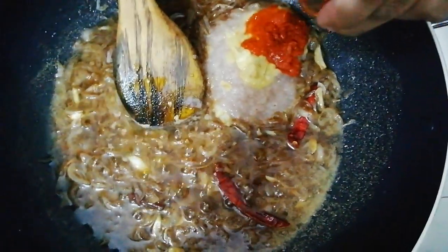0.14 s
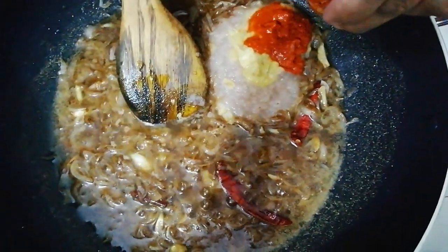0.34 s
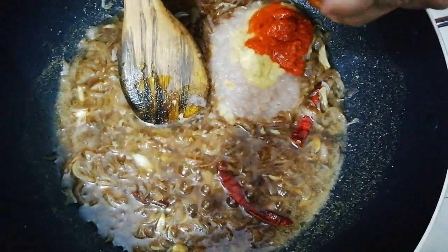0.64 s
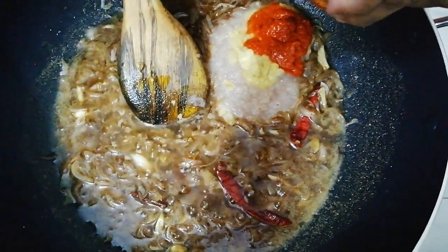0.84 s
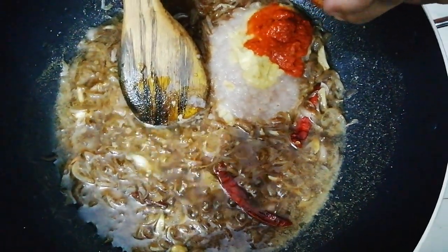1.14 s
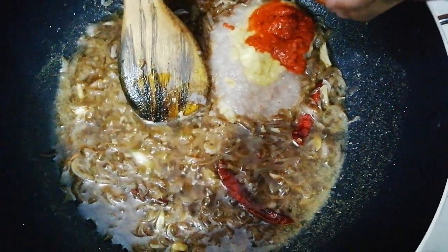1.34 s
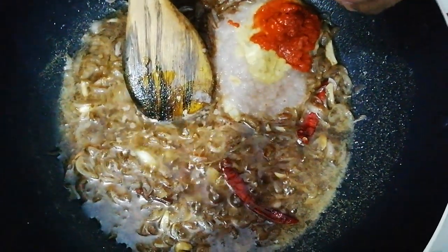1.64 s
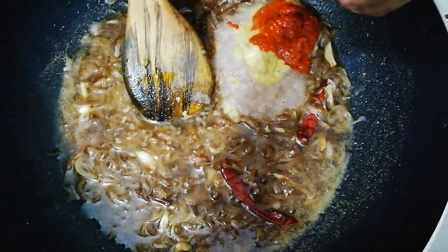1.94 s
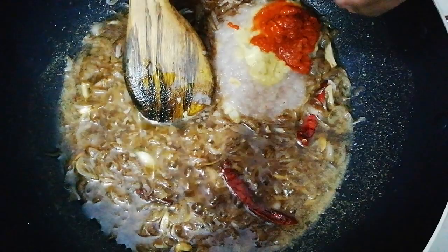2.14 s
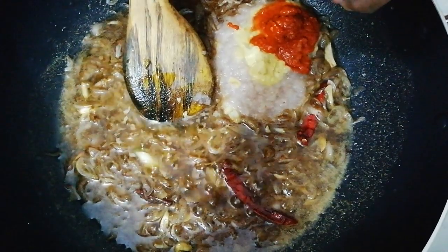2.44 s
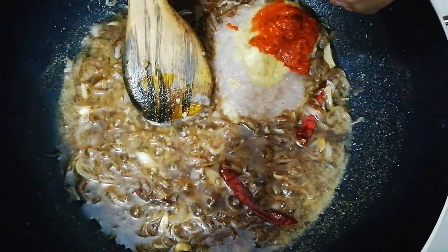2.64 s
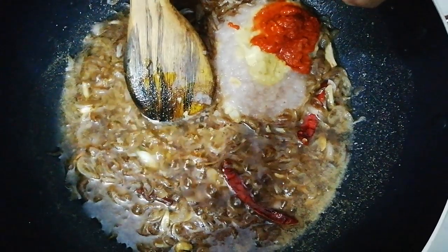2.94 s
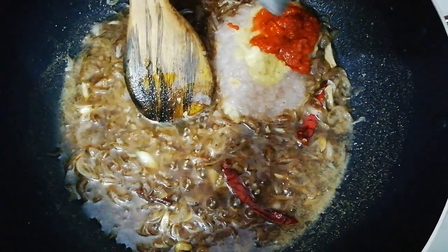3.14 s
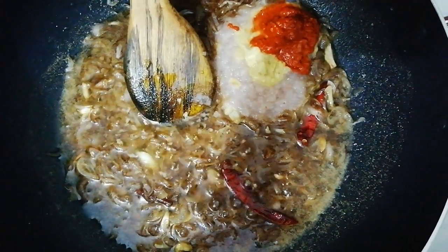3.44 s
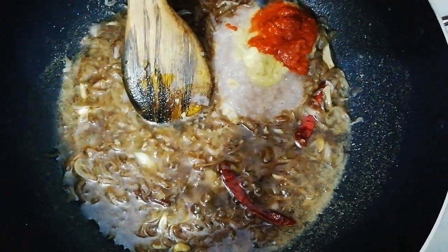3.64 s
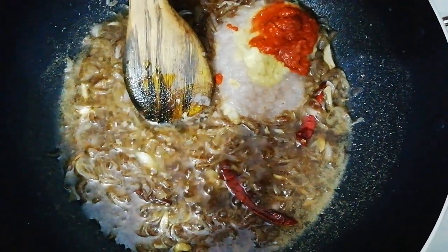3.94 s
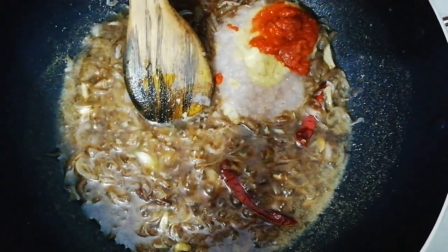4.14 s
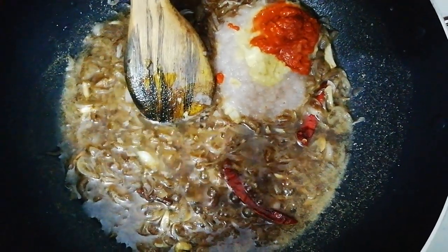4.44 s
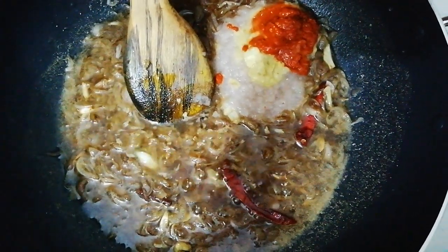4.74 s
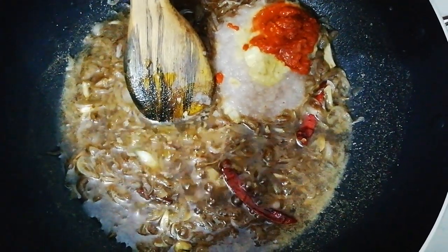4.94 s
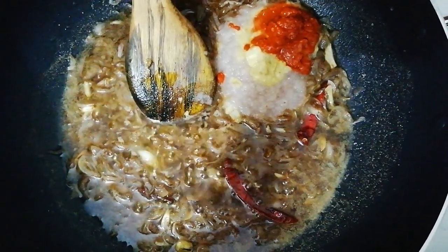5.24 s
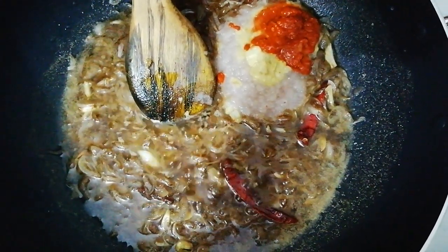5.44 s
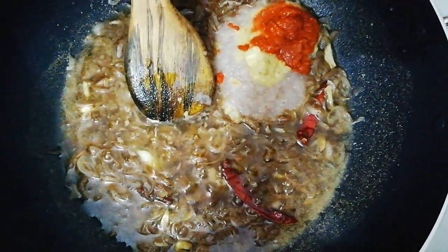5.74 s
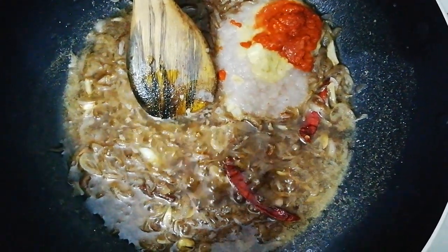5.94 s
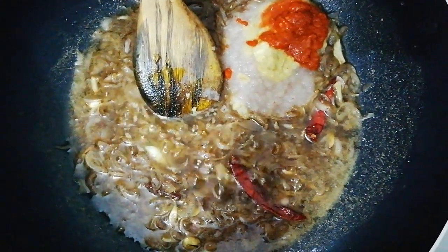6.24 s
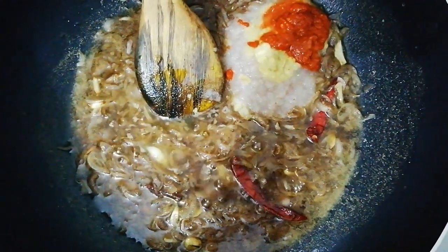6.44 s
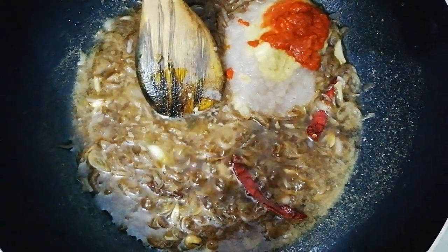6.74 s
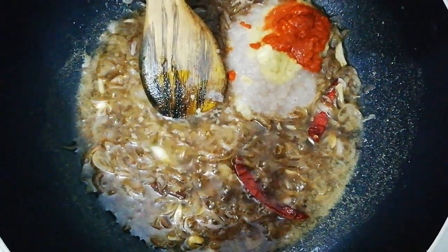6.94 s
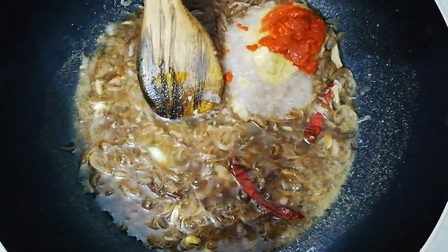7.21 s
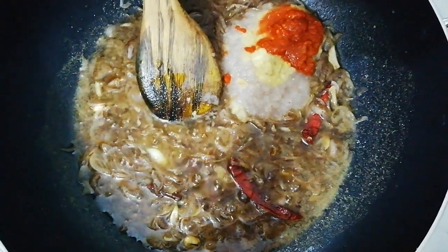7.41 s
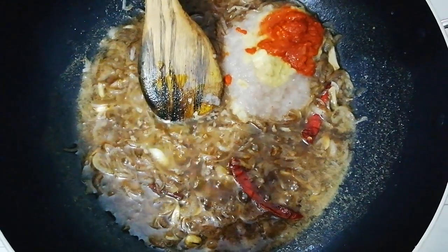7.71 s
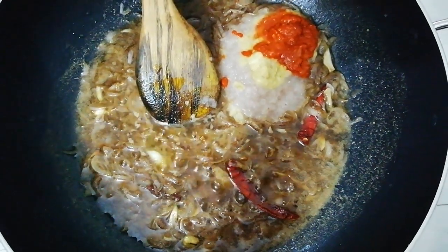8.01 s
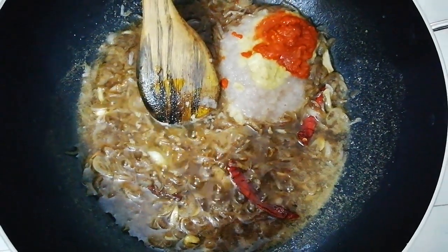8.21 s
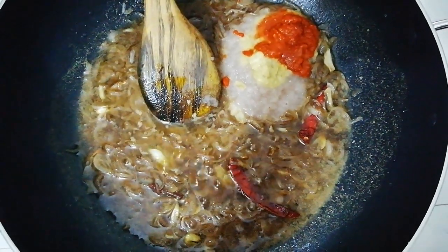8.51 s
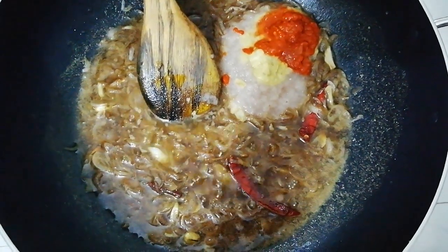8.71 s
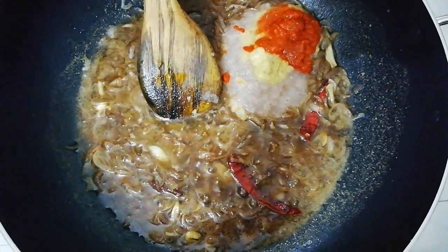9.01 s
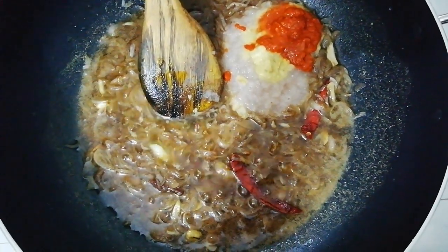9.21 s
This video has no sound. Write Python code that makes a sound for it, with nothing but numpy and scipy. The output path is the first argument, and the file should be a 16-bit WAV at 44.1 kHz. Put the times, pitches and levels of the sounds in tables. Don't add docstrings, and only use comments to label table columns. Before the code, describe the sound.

A close stereo pickup in a hard-walled home kitchen. Throughout, onions fry gently: a thin, high fizz of tiny steam bubbles with scattered crisp pops, leaning right, over a low fan hum with faint motor whines. From 0.1 to 3.3 seconds a steel spoon strikes a small hand-held steel bowl in irregular loud clinks, bright and very short, with lighter bounces, brief edge scrapes and a few soft dull knocks into paste; each leaves a short splashy room tail. After a pause, another cluster comes at 4.2 to 4.8, and a last weaker tap near 5.1. At about 6.1 a faint thin metal rattle sings as the bowl is lifted away. Sharper oil pops snap near 6.35. A dull soft thud comes from next door at 8.0, a stronger one at 8.3, and at 8.4 the bowl is set down further off, rocking quickly with a freer ring. Frying and fan continue to the end, with clear pops around 9.

```python
import sys
import numpy as np
from scipy import signal
from scipy.fft import irfft, next_fast_len
from scipy.io import wavfile

SR = 44100
rng = np.random.default_rng(int(sys.argv[2]) if len(sys.argv) > 2 else 0)


def dump(signal):
    limited = np.clip(np.atleast_2d(signal).T, -1, 1)
    pcm = np.round(limited * 32767).astype(np.int16)
    wavfile.write(sys.argv[1], SR, pcm)


def undo_db(level):
    steps = np.asarray(level, float) / 20
    return 10 ** steps


N = 413216
LEAD = SR // 4


def rms_one(x):
    return x / np.sqrt(np.mean(x ** 2) + 1e-20)


def at_hz(points, hz):
    points_hz, values = np.transpose(points)
    return np.interp(np.log(hz), np.log(points_hz), values)


def band(x, low_hz, high_hz):
    return signal.sosfilt(signal.butter(2, [low_hz, high_hz], "band", fs=SR, output="sos"), x)


# pitch_hz, likeness (0 to 1)
LIKENESS = [(30, .998), (60, 1), (125, 0.96), (250, 0.9), (400, 0.83), (600, 0.024), (2000, 0.028),
            (12000, 0.0084)]


def coloured_noise(spectrum):
    size = next_fast_len(N)
    hz = np.maximum(np.arange(size // 2 + 1) * SR / size, 1)
    mid, side = rng.standard_normal((2, len(hz), 2)) @ [1, 1j]
    alike = np.clip(at_hz(LIKENESS, hz), 0, 1)
    left_right = np.array([[1], [-1]])
    pair = np.sqrt(1 + alike) * mid + np.sqrt(1 - alike) * side * left_right
    return rms_one(irfft(pair * undo_db(at_hz(spectrum, hz)), size)[:, :N])


# pitch_hz, level_db (per Hz)
HUM = [(12, -49), (20, -10.5), (64, -1.5), (156, -13), (304, -8.5), (339, -11), (370, -10.5), (677, -13),
       (859, -10), (1680, -15.5), (1910, -15.5), (2480, -20), (3500, -51), (4550, -74), (7700, -120)]
HUM_DB = -47.5
# pitch_hz, width_hz, wavering_db, steady_db
WHINES = [(63.4, 13.9, -56, -71), (96.9, 13, -62, -67), (204.6, 12, -75, -88), (264, 10, -80, -78),
          (370.2, 4.3, -64, -60.5), (428, 14, -61, -76.5), (1079, 2.1, -76.5, -100), (1860, 11, -64.5, -75),
          (1880, 8.5, -65.5, -86)]


def fan():
    out = undo_db(HUM_DB - 2.0) * coloured_noise(HUM)
    t = np.arange(N) / SR
    for hz, width, wavering_db, steady_db in WHINES:
        peak = [(hz - 4 * width, -90), (hz - width / 2, -3), (hz, 0),
                (hz + width / 2, -3), (hz + 4 * width, -90)]
        out += undo_db(wavering_db) * coloured_noise(peak)
        turns = rng.random((2, 1)) * (1 - at_hz(LIKENESS, hz))
        out += undo_db(steady_db + 4.5) * np.sin(2 * np.pi * (hz * t + turns))
    return out


# start_s, level_db, boom_hz, rumble_s
THUDS = [
    (7.972, -47.5, 205, 0.13),
    (8.309, -43, 283, 0.17),
]


def thuds():
    out = np.zeros((2, N))
    t = np.arange(SR // 2) / SR
    for s, db, hz, length in THUDS:
        noise = rng.standard_normal((2, len(t))) * 0.92 + rng.standard_normal(len(t))
        boom = rms_one(band(noise, hz * 0.9, hz * 1.47))
        knock = rms_one(band(noise, hz * 1.02, hz * 2.74))
        shape = np.clip(t / 0.0024, 0, 1) * undo_db(-15 * t - 180 * np.maximum(t - length, 0))
        at = round(s * SR)
        out[:, at:at + len(t)] += undo_db(db) * (boom + undo_db(0.5) * knock) * shape
    return out


def ring(clicks, hz, t60):
    r, w = undo_db(-60 / (t60 * SR)), 2 * np.pi * hz / SR
    return signal.lfilter([0, np.sin(w)], [1, -2 * r * np.cos(w), r * r], clicks + 1e-18)


def burst(clicks, hz, cycles):
    t60 = cycles / hz
    return ring(ring(clicks, hz, t60), hz, t60)


# start_s, level_db (peak), left_minus_right_db
POPS = [(0.2977, -31, -1), (1.8205, -32, -2.0), (3.1486, -33, -13), (3.2102, -53.5, -9), (3.269, -40, -13),
        (3.6959, -34, -14), (3.9693, -34, -11), (4.0042, -28.5, -9), (4.6616, -33, -4), (4.9995, -45, -4.0),
        (5.4657, -34, -5), (5.5411, -31.5, -15), (5.6738, -31, -4), (5.839, -32, -0.6), (6.3736, -37, 1),
        (6.35, -23.5, -14), (6.3614, -24, 6), (6.7725, -29.5, -3), (6.9375, -36, -3), (7.0696, -32.5, -9),
        (7.1936, -33, -14), (7.614, -35, -5), (7.6613, -33, -8), (7.7032, -32, -5), (7.92, -32.5, -0.6),
        (8.2101, -33.5, -11), (8.2969, -33.5, -4), (8.3598, -31, -3), (8.922, -27.5, -6), (9.0137, -27, -6)]
POP_HZ, POP_SPREAD = 8060, 0.071
SMALL_POPS, SMALL_POP_DB, SMALL_POP_SPREAD_DB, PAN_DB, PAN_SPREAD_DB = 55, -39, 3, -7, 5


def pops():
    size, side = rng.standard_normal((2, SMALL_POPS))
    small_s = rng.random(SMALL_POPS) * N / SR
    small = [small_s, SMALL_POP_DB + SMALL_POP_SPREAD_DB * size, PAN_DB + PAN_SPREAD_DB * side]
    s, db, pan_db = np.hstack([np.transpose(POPS), small])
    hz = POP_HZ * np.exp(POP_SPREAD * rng.standard_normal(len(s)))
    return zip(s, db, hz, pan_db)


# pitch_hz, level_db (per Hz)
FIZZ = [(1290, -4), (2200, -8.5), (2850, -1.5), (3530, -3), (3770, -2.5), (4960, -1), (5350, -3),
        (6010, -2), (8030, 5), (9250, -6.5), (10200, -18.5), (14000, -21.5), (15600, -18), (16100, -40)]
FIZZ_DB = -48.5


def oil():
    sizes = undo_db(5.4 * np.minimum(rng.exponential(1, N), 4.5)) * rng.choice([-1, 1], N)
    born = rng.random(N) < 1500 / SR
    pitches_hz = np.geomspace(3000, 14000, 14)
    dealt = rng.integers(0, 14, N)
    side_db = 7.7 * rng.standard_normal(N)
    clicks = sizes * born * undo_db(np.array([side_db, -side_db]))
    grains = np.zeros((2, N))
    for k, hz in enumerate(pitches_hz):
        bubbles = rms_one(burst(clicks * (dealt == k), hz, cycles=11.0))
        grains += undo_db(at_hz(FIZZ, hz)) * np.sqrt(hz) * bubbles
    out = undo_db(FIZZ_DB - 6) * rms_one(grains)
    for s, db, hz, pan_db in pops():
        at = int(s * SR)
        pop = burst(np.arange(400) == 0, hz, cycles=17.7)[:N - at]
        sides = undo_db(db + np.array([[pan_db], [-pan_db]]) / 2)
        out[:, at:at + len(pop)] += sides * pop / np.abs(pop).max()
    muffled = band(out, 2100, 11300)
    return muffled + undo_db(FIZZ_DB - 3.5) * coloured_noise(FIZZ)


# pitch_hz, t60_s
KITCHEN = [(800, 0.057), (2000, 0.79), (4000, 0.5), (8000, 0.53), (14000, 0.23)]


def kitchen(x):
    t, tail = np.arange(SR * 3 // 4) / SR, 0
    edges = 500 * 2 ** np.arange(0, 5.3, .5)
    for low, high in zip(edges, edges[1:]):
        decay = undo_db(-60 * t / at_hz(KITCHEN, np.sqrt(low * high)))
        tail = tail + band(rng.standard_normal((2, len(t))), low, high) * decay
    tail = tail * np.clip((t - .003) / 0.0009, 0, 1)
    tail = tail / np.sqrt(np.sum(tail ** 2) / 2)
    return signal.fftconvolve(x[None], tail, axes=1)[:, :len(x)]


def rows(s, db, hz, knock_db, ring_db, room_db):
    return np.transpose(np.broadcast_arrays(s, db, hz, knock_db, ring_db, room_db))


# start_s, level_db (peak), brightest_hz, hollow_knock_db, spoon_ring_db
TAPS = [(0.1175, -7, 7350, -19.5, 6.5), (0.806, 1, 6000, -39, -6), (1.1221, -6.5, 6240, -41, -18),
        (1.3572, 0.5, 5900, -50, -17), (1.6247, -3.5, 6300, -26, -21), (1.936, -5, 5950, -35, -5),
        (2.137, -6.5, 7900, -20.5, 4.5), (2.2127, -11, 5600, -43, -6), (2.4094, -2.5, 7600, -22, 2),
        (2.6743, -4, 7450, -22, 0), (2.7462, -5.5, 6260, -53, -3), (2.933, -10.5, 7260, -31, 2.5),
        (3.3042, -2.5, 6100, -17.5, -4), (4.165, -8.5, 6450, -30, 2.5), (4.2586, -13, 6300, -43, -4),
        (4.3, -3, 5940, -35, 0), (4.434, -3, 6300, -51, -7), (4.7436, -1, 7000, -40, 3.5),
        (5.116, -11, 7500, -15, -7)]
# start_s, level_db (peak), brightest_hz
MORE_TAPS = [(0.172, -10, 7080), (0.1892, -5, 5360), (0.7388, -24, 7500), (0.7598, -19, 8350),
             (0.7893, -12, 5720), (1.0795, -16, 5850), (1.0994, -6.5, 5600), (1.6697, -13.5, 7100),
             (1.8885, -16, 8100), (1.911, -19, 5800), (1.95, -12.5, 6100), (2.453, -15, 7000),
             (2.7222, -11.5, 7340), (2.9956, -15, 6400), (4.2171, -12, 6860), (4.275, -16, 6900),
             (4.3105, -2.5, 6800), (5.079, -33, 7240)]
MORE_TAPS_KNOCK_DB, MORE_TAPS_RING_DB = -34, -4
# start_s, level_db
LANDINGS = [(0.415, -36), (1.042, -30.5), (1.3226, -32.5), (5.0482, -35), (5.1071, -31.5)]
LANDING_HZ, LANDING_KNOCK_DB, LANDING_RING_DB = 7170, 2.5, 0
# start_s, length_s, level_db, brightest_hz, spoon_ring_db
SCRAPES = [(-.16, 0.064, -16.5, 5840, -5), (0.129, 0.081, -24.5, 5500, -11),
           (0.738, .068, -27.5, 5500, -20), (1.081, 0.041, -38, 5950, -20),
           (1.884, 0.062, -33.5, 5960, -12), (2.15, .06, -50, 6500, -11), (2.419, 0.039, -28, 5800, 0),
           (2.677, 0.041, -27, 6130, -4), (2.962, 0.038, -29, 6300, -3), (4.254, 0.027, -24.5, 6300, -1.5),
           (4.288, 0.03, -32.5, 5840, 2), (4.431, 0.014, -29.5, 6500, -13), (5.076, 0.05, -34.5, 6950, -14),
           (6.433, 0.033, -45.5, 6460, -16), (8.389, 0.029, -35.5, 6000, -20)]
SCRAPE_KNOCK_DB = -27
# start_s, length_s, level_db, spoon_ring_db
RATTLES = [
    (6.061, .014, -44, 11),
    (6.086, .02, -55, 22),
    (6.11, .22, -62, 9),
]
RATTLE_HZ, RATTLE_KNOCK_DB = 8600, -26
ROOM_DB, ROOM_DB_PER_DB = -19.5, -0.22
SCRAPE_ROOM_DB, LIFTED_ROOM_DB, LIFTED_S = -19.5, -4, 6


def contacts():
    s, db, hz, knock_db, ring_db = np.transpose(TAPS)
    out = [rows(s, db, hz, knock_db, ring_db, ROOM_DB + ROOM_DB_PER_DB * db)]
    s, db, hz = np.transpose(MORE_TAPS)
    out.append(rows(s, db, hz, MORE_TAPS_KNOCK_DB, MORE_TAPS_RING_DB, ROOM_DB + ROOM_DB_PER_DB * db))
    s, db = np.transpose(LANDINGS)
    out.append(rows(s, db, LANDING_HZ, LANDING_KNOCK_DB, LANDING_RING_DB, SCRAPE_ROOM_DB + 10.5))
    drags = [(s, length, db, hz, SCRAPE_KNOCK_DB, ring_db) for s, length, db, hz, ring_db in SCRAPES]
    drags += [(s, length, db, RATTLE_HZ, RATTLE_KNOCK_DB, ring_db) for s, length, db, ring_db in RATTLES]
    for s, length, db, hz, knock_db, ring_db in drags:
        jitter, size = rng.random((2, 16))
        where = (np.arange(16) + jitter) / 16
        slip_db = db + 16 * size ** 3 + 2.5
        room_db = SCRAPE_ROOM_DB if s < LIFTED_S else LIFTED_ROOM_DB
        out.append(rows(s + length * where, slip_db, hz, knock_db, ring_db, room_db))
    return np.vstack(out).T


PORT_TURNS = 0.23


def strike(s, share_db, modes, room_db, left_db, detune, luck_db):
    hz, level_db, t60 = np.transpose(modes)[:, :, None]
    t = np.arange(round(t60.max() * SR)) / SR
    fade = undo_db(-60 * t / t60) * np.minimum(t / .0005, 1)
    out = np.zeros((3, N + LEAD + len(t)))
    shift, *luck = rng.standard_normal((4, len(s), len(modes)))
    luck = np.array(luck)
    turns = rng.random((len(s), 3, len(modes)))
    turns[:, 1] = turns[:, 0] + PORT_TURNS * rng.standard_normal((len(s), len(modes)))
    for k, at in enumerate(np.round(s * SR).astype(int) + LEAD):
        touch_hz = hz * (1 + detune * shift[k, :, None])
        waves = fade * np.exp(2j * np.pi * touch_hz * t)
        path_db = np.array([[left_db], [-left_db], [room_db[k]]]) + luck_db * luck[:, k]
        gains = undo_db(share_db[k] + level_db.T + path_db) * np.exp(2j * np.pi * turns[k])
        out[:, at:at + len(t)] += (gains @ waves).imag
    return out[:, :N + LEAD]


# Modes, all as pitch_hz, level_db, t60_s. The bowl damped by the hand:
BOWL = [(2060, -17, 0.02), (2584, -13, 0.03), (3174, -6.5, 0.0066), (3714, -13, 0.032), (4344, -5, 0.0099),
        (4796, -10, 0.028), (5140, -4, 0.0073), (5720, 0.5, 0.02), (5950, -4.5, 0.033), (6260, -3, 0.012),
        (6450, 0, 0.01), (7080, -14.5, 0.02), (7560, -9.5, 0.053), (8094, -1, 0.02), (8400, -4, 0.02),
        (9840, -11.5, 0.027), (10860, -14.5, 0.023), (11500, -46, 0.0071), (12800, -37, .008),
        (14600, -20, 0.016), (16000, -48, .006)]
KNOCK = [(1284, 5, 0.016), (1506, 2, 0.023), (2070, -2, 0.01)]
SPOON = [(7122, 2, 0.035)]
CRACK = [(3560, -3, 0.0052), (5410, 5.5, 0.0027), (6500, 9.5, 0.0026), (7580, 5, 0.0021),
         (9560, -2, 0.0043), (11060, -6, 0.0017), (13100, -12, 0.0022), (14250, -8, 0.0017),
         (15000, -16, 0.0015)]
FREE_BOWL = [(2586, -8, 0.037), (4720, -7.5, 0.13), (5240, -9, .04), (5500, -12, 0.029), (5930, 0, 0.069),
             (5940, 2, 0.093), (6300, 6.5, 0.027), (6900, 8, 0.024), (7100, 2, 0.048), (7550, -16, .04),
             (8140, -1.5, 0.085), (8740, -9.5, 0.041), (10200, -4, 0.018), (10690, -28, .08),
             (11060, -22, 0.089), (13000, -26, .15), (13100, -17, 0.34), (13800, -27, .1),
             (14480, -12, 0.23)]
# start_s, level_db
SET_DOWN = [
    (8.391, -25),
    (8.395, -28.5),
    (8.409, -25),
    (8.43, -21),
]
LAG = 26


def bowl():
    s, db, bright_hz, knock_db, ring_db, room_db = contacts()
    octaves_off = np.abs(np.log2(np.array(BOWL)[:, 0] / bright_hz[:, None]))
    focus_db = -np.minimum(25 * octaves_off, 6)
    out = strike(s, db[:, None] + focus_db - 5, BOWL, room_db + 11.0, left_db=0.8, detune=0.023, luck_db=2.5)
    hollow_db, spoon_db = (db + knock_db)[:, None] - 1, (db + ring_db)[:, None] - 8.5
    out += strike(s, hollow_db, KNOCK, room_db + 6.5, left_db=3.0, detune=0.037, luck_db=2.0)
    out += strike(s, spoon_db, SPOON, room_db + 12, left_db=1.8, detune=0.001, luck_db=1.5)
    out += strike(s, db[:, None] - 17.5, CRACK, room_db - 14, left_db=7.0, detune=0.013, luck_db=4.0)
    s, db = np.transpose(SET_DOWN)
    out += strike(s, db[:, None] - 9.5, FREE_BOWL, db * 0 + 13.5, left_db=3.0, detune=0.011, luck_db=1.1)
    left, right, far = band(out, 850, 17000)
    near = np.array([left, np.roll(right, LAG)])
    return (near + kitchen(far))[:, LEAD:]


def scene():
    return fan() + thuds() + oil() + bowl()


def top_cut(x):
    return signal.sosfilt(signal.butter(12, 16550, fs=SR, output="sos"), x)


def record(dry):
    held = np.clip(dry, -.86, .86)
    dull = signal.sosfilt(signal.cheby2(12, 70, 16500, fs=SR, output="sos"), held)
    return top_cut(dull)


dry = scene()
out = record(dry)
dump(out)
```